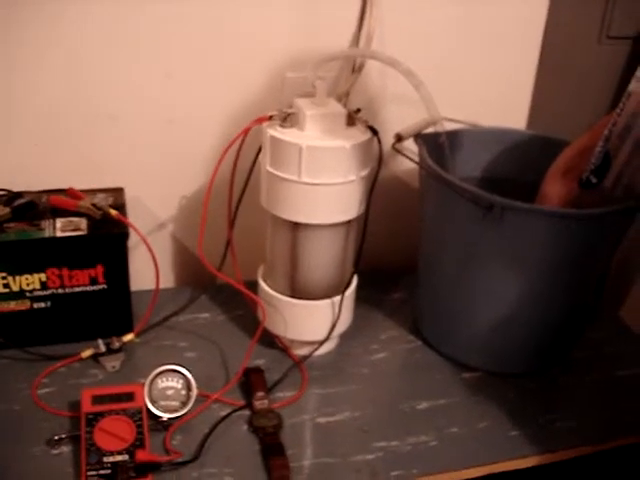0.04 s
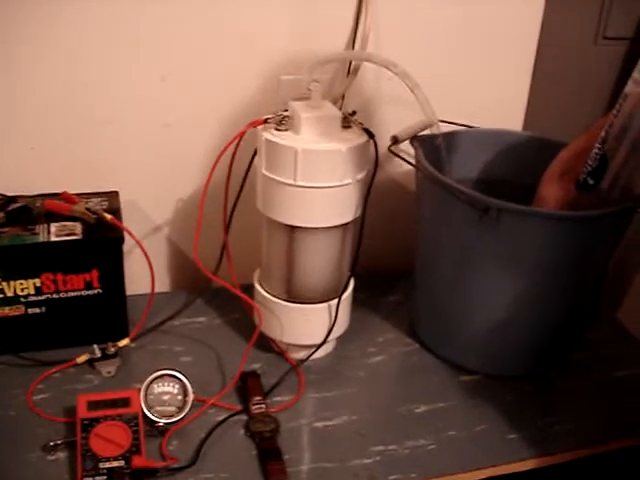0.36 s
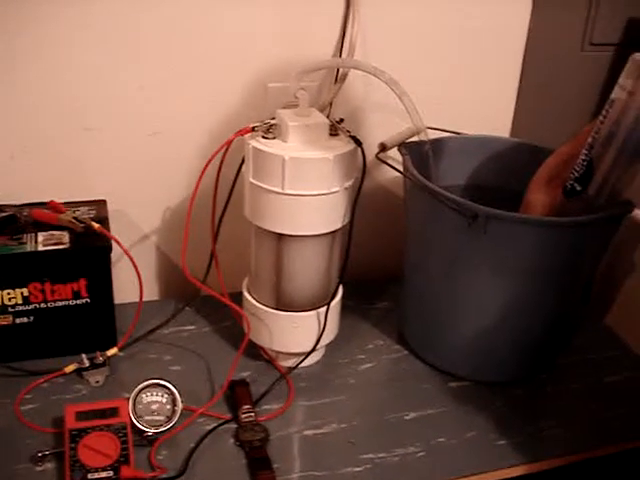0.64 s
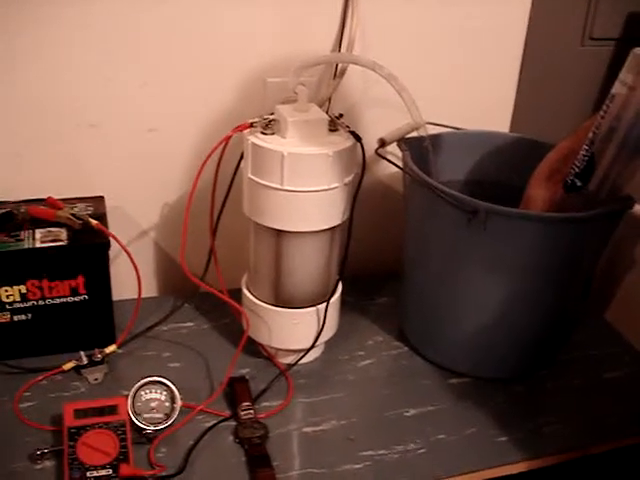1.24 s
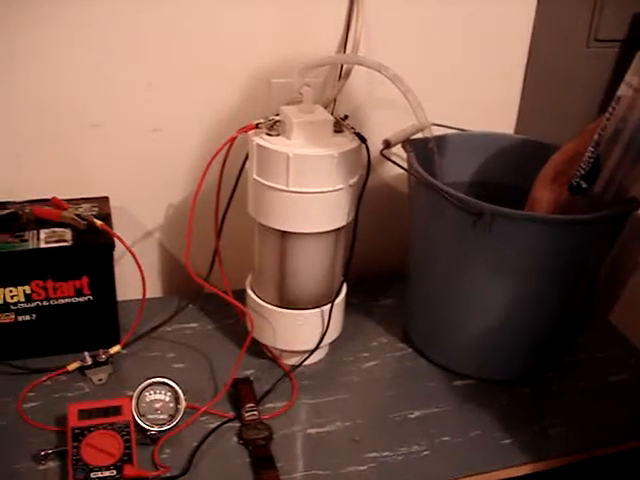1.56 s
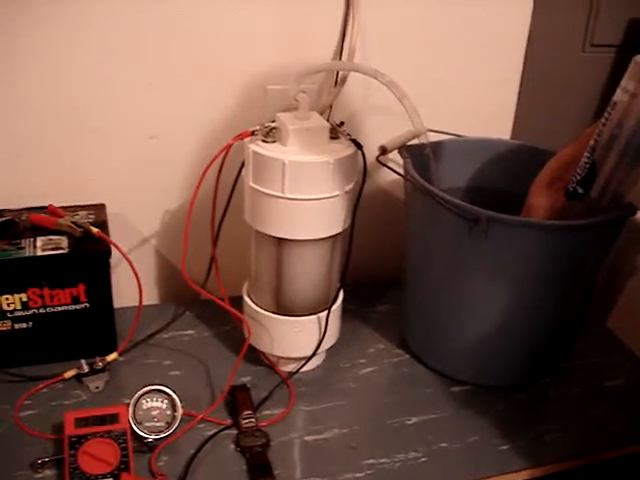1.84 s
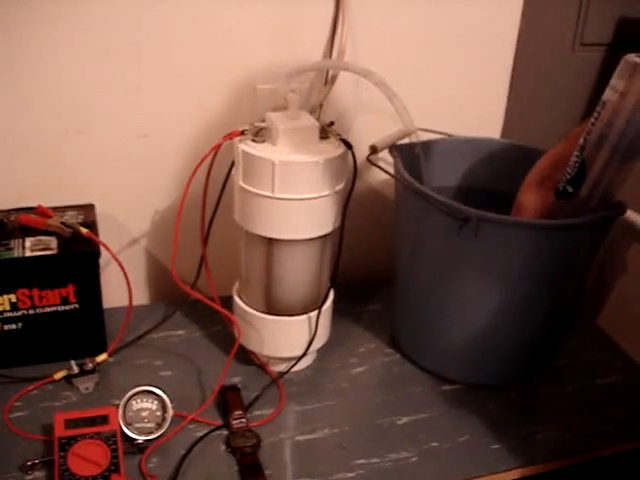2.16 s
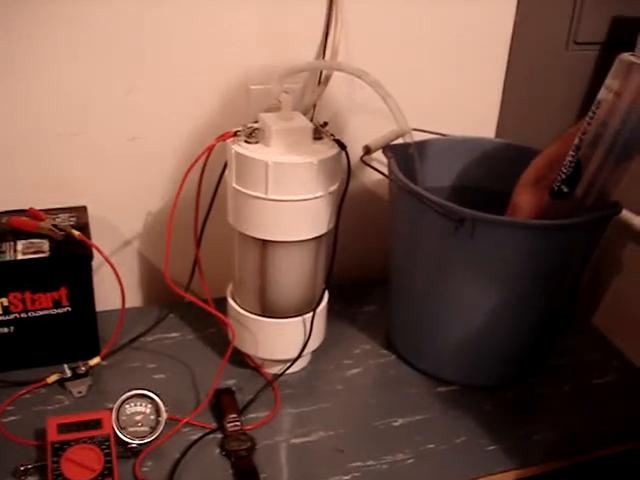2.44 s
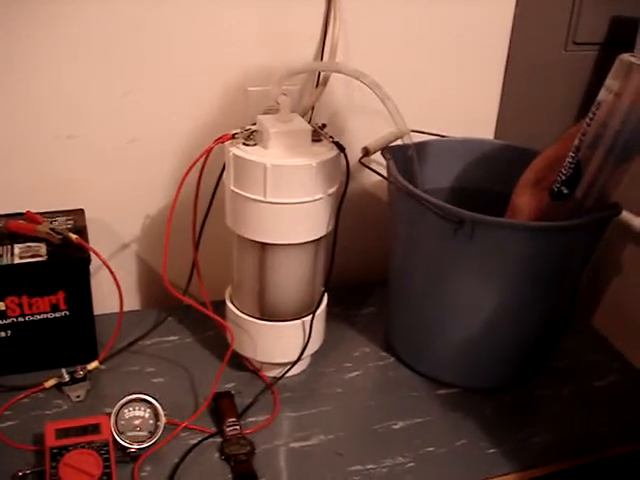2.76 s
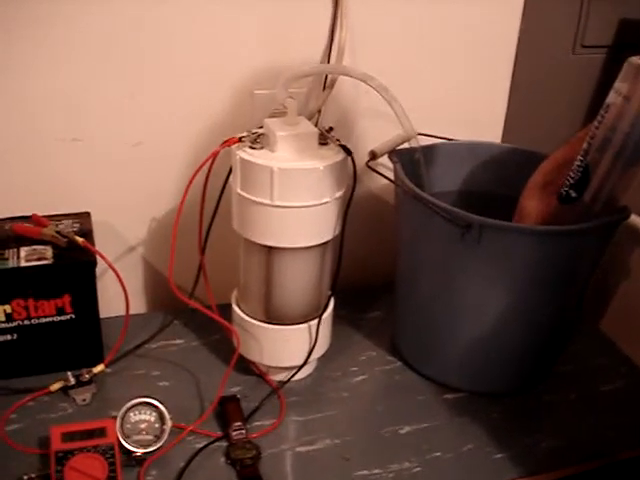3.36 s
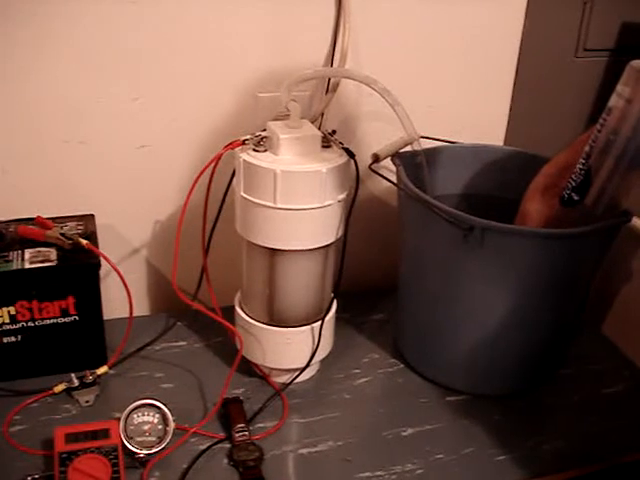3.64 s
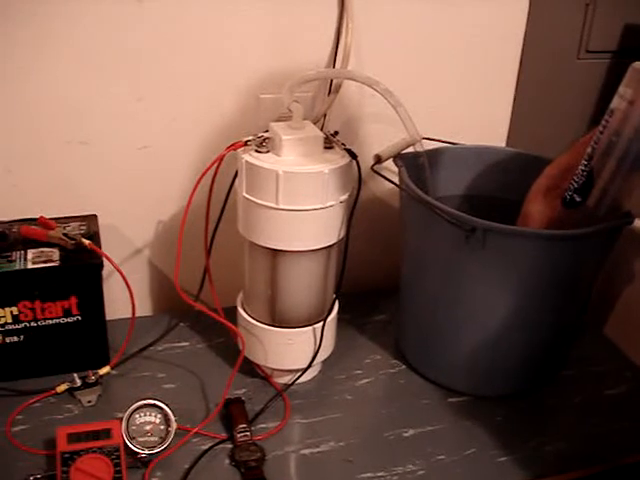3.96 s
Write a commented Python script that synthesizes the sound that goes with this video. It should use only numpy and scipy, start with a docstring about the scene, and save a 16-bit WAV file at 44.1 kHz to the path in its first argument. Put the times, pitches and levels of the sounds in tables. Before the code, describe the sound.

Low bubbling comes in short uneven clusters as gas escapes underwater, each bubble knocking hollowly in the bucket. A steady hum, room air and a thin whirr fill the small workshop, with a brief faint sizzle near the end.

```python
"""A small workshop: gas leaves a tube under water in irregular bursts of two to five bubbles.
Each bubble rings briefly with rising pitch, gulps and knocks the low modes of the vessel;
a few small ones plip higher. Behind them: room air, a steady electrical hum, a thin fizzy whirr.
One faint tick midway, a short sizzle near the end."""
import sys
import numpy as np
from scipy import signal
from scipy.fft import rfft, irfft
from scipy.io import wavfile

SR = 44100
rng = np.random.default_rng(int(sys.argv[2]) if len(sys.argv) > 2 else 0)


def materialize(psi):
    """Save the field psi as 16-bit PCM at rate SR to the path in sys.argv[1].

    A 1-D psi becomes a single channel; in a 2-D psi each row is a channel.
    """
    bounded = np.clip(np.atleast_2d(psi).T, -1, 1)
    quanta = np.round(bounded * 32767).astype(np.int16)
    wavfile.write(sys.argv[1], SR, quanta)


N = 176400

# Room air spectrum. Each row: frequency in Hz, relative density in dB.
AIR_SPECTRUM = [(20, -5.5), (30, -5), (45, -17.5), (75, -5.5), (120, -3.5), (150, -3.5), (200, 1.5),
                (270, 1), (325, -2.5), (400, 5), (470, -2), (550, 2.5), (720, 0.5), (820, -2), (1100, -3),
                (1400, -10), (2000, -11), (3800, -7.5), (4300, -15.5), (5200, -16), (6200, -20.5),
                (7500, -22), (8300, -22.5), (10000, -24.5)]
# Electrical hum. Each row: frequency in Hz, rms level in dB.
HUM_LINES = [(120, -61), (199.2, -51.5), (398.4, -57), (517, -64), (599, -58.5), (700, -57.5),
             (1038, -61.5), (1181, -66.5), (1320, -70), (1620, -71)]
# Whirr resonances. Each row: centre in Hz, width in Hz, base level in dB, fade in dB per second.
WHIRR_BANDS = [(2455, 370, -54, 1.4), (2637, 420, -62, -0.5), (2960, 100, -54, 0.1),
               (3126, 170, -50.5, 0.84), (3240, 100, -55, -.5), (3603, 330, -53.5, -0.4),
               (3823, 140, -55.5, 1.8)]
# Tones in the whirr. Each row: frequency in Hz, base level in dB.
WHINE_LINES = [(2401, -68), (3058, -53.5), (3106, -60), (3138, -56.5), (3215, -66.5), (3661, -61.5),
               (3704, -68.5), (7612, -82)]
# Gain curve over the whirr's bands and tones. Each row: time in seconds, gain in dB.
WHIRR_GAIN = [(0, 0), (1.4, 1.5), (2.4, 0.2), (3.3, -.7), (4, -4.5)]
# Vessel modes. Each row: frequency in Hz, relative level in dB, T60 in seconds.
VESSEL_MODES = [(235, -13.5, 0.15), (290, -13, 0.1), (350, -14, .06), (518, 2, 0.17), (559, -14, 0.035),
                (631, 5.5, 0.063), (703.3, -1, 0.13), (767, -19.5, 0.041)]
# Small bubbles. Each row: start in seconds, initial pitch in Hz, gain in dB.
SMALL_BUBBLES = [(.122, 1080, -42), (0.39, 2010, -39.5), (.828, 1090, -36), (1.306, 1160, -43),
                 (1.495, 2180, -38.5), (1.598, 2300, -38), (1.765, 1110, -40), (2.140, 1654, -39),
                 (2.727, 1188, -31.5), (3.549, 980, -41)]
# Large bubbles. Each row: start in seconds, initial pitch in Hz, ring gain in dB,
# ring decay in seconds, knock gain in dB, gulp gain in dB.
LARGE_BUBBLES = [(.083, 656, -29, 0.011, -37.5, -38), (.123, 640, -23, 0.0045, -38, -46),
                 (.389, 689, -33, 0.025, -41, -60), (.673, 684, -28, 0.0087, -38.5, -48),
                 (.722, 594, -36, .005, -40, -39.5), (.783, 650, -21.5, 0.011, -40, -47),
                 (.9725, 678, -30, 0.012, -34.5, -37.5), (1.2585, 674, -25, 0.0092, -41.5, -49),
                 (1.3055, 677, -29.5, 0.012, -40.5, -45), (1.580, 680, -22, 0.024, -45, -47),
                 (1.620, 675, -30, 0.013, -40, -64), (1.661, 691, -36, 0.021, -41, -63),
                 (1.764, 667, -24, 0.0097, -46, -48), (1.810, 690, -32.5, 0.017, -36, -40.5),
                 (2.056, 678, -27.5, .007, -40, -42), (2.100, 710, -32.5, 0.012, -39.5, -36.5),
                 (2.154, 680, -23.5, 0.013, -41, -44), (2.567, 685, -33.5, 0.0063, -40, -53),
                 (2.617, 680, -31.5, 0.0093, -36.5, -39), (2.673, 630, -19.5, 0.0053, -42.5, -46),
                 (2.727, 692, -33, 0.016, -46, -61), (2.801, 674, -20.5, 0.013, -43, -44),
                 (3.100, 690, -34, 0.021, -38, -39), (3.140, 666, -27, .006, -49, -36),
                 (3.195, 686, -22.5, 0.016, -44, -45), (3.4945, 663, -33, 0.0043, -37, -43),
                 (3.628, 630, -28, .007, -38, -57), (3.671, 690, -27, 0.0067, -39, -54),
                 (3.724, 668, -23, 0.011, -45, -59), (3.776, 670, -24, .011, -43, -42),
                 (3.825, 675, -22, 0.0086, -40, -46)]


def undb(db):
    """Decibels to gain."""
    return 10 ** (np.asarray(db) / 20)


def add(out, start_s, sound):
    """Mix a sound in at its start time."""
    i = max(int(start_s * SR), 0)
    out[i:i + len(sound)] += sound[:max(N - i, 0)]


def noise(shape):
    """Unit-rms noise with spectral gain shape(Hz)."""
    hz = np.arange(N // 2 + 1) * SR / N + 1e-3
    x = irfft(rfft(rng.standard_normal(N)) * shape(hz), N)
    return x / np.sqrt(np.mean(x ** 2))


def band(hz, width_hz):
    """Unit-rms noise in a steep resonance."""
    return noise(lambda f: 1 / (1 + ((f * f - hz * hz) / (f * width_hz)) ** 2))


def wander(rate_hz):
    """Unit-rms random drift, low-passed at rate_hz."""
    return noise(lambda f: 1 / (1 + (f / rate_hz) ** 4))


def tones(table, drift_hz, drift_rate_hz, flutter_db):
    """Sines wavering in pitch and level."""
    out = np.zeros(N)
    for hz, db in table:
        peak = np.sqrt(2) * undb(db + flutter_db * wander(rate_hz=14))
        cycles = rng.random() + np.cumsum(hz + drift_hz * wander(drift_rate_hz)) / SR
        out += peak * np.sin(2 * np.pi * cycles)
    return out


def air(level_db=-43.5, flutter_db=0.4):
    """Even broadband room noise."""
    hz, db = np.array(AIR_SPECTRUM).T
    gain = undb(level_db + flutter_db * wander(rate_hz=6.3))
    return gain * noise(lambda f: undb(np.interp(np.log(f), np.log(hz), db)))


def hum():
    """Electrical hum: near-steady low tones."""
    return tones(HUM_LINES, drift_hz=0.91, drift_rate_hz=5.85, flutter_db=1.66)


def whirr(fizz_db=0.38, hiss_db=-63, throb_db=2, throb_peak_s=0.025, throb_period_s=0.278):
    """Fizzy noise in narrow resonances, whining tones, a throbbing hiss above."""
    t = np.arange(N) / SR
    body = sum(undb(db - fade_db_per_s * t) * band(hz, width_hz)
               for hz, width_hz, db, fade_db_per_s in WHIRR_BANDS)
    body *= undb(fizz_db * wander(rate_hz=130))
    whine = tones(WHINE_LINES, drift_hz=3.32, drift_rate_hz=14.4, flutter_db=4.0)
    gain_db = np.interp(t, *np.array(WHIRR_GAIN).T)
    throb = np.cos(2 * np.pi * (t - throb_peak_s) / throb_period_s)
    hiss = undb(hiss_db + throb_db * throb) * band(6910, width_hz=400)
    return (body + whine) * undb(gain_db) + hiss


def tick(centre_s=2.531, width_s=0.004, level_db=-45):
    """One faint tick: a Gaussian burst of high noise."""
    t = np.arange(N) / SR
    return undb(level_db) * np.exp(-((t - centre_s) / width_s) ** 2) * band(5100, width_hz=1500)


def sizzle(start_s=3.82, decay_s=0.11, band_db=-57):
    """A thin noise band and a wider spray: sudden onset, fast decay."""
    t = np.arange(N) / SR
    bands = band(8500, width_hz=550) + band(6500, width_hz=3100)
    envelope = (t > start_s) * np.exp(-abs(t - start_s) / decay_s)
    return undb(band_db) * bands * envelope


def room(x, t60_s=0.19, delay_s=0.00593, wet_db=-14):
    """Add a short diffuse tail from the near walls."""
    t = np.arange(SR // 2) / SR
    tail = rng.standard_normal(len(t)) * undb(-60 * t / t60_s) * (t > delay_s)
    tail /= np.sqrt(np.sum(tail ** 2))
    return x + undb(wet_db) * signal.fftconvolve(x, tail)[:N]


def knock(attack_s=0.00085, detune_spread=0.0061):
    """Vessel modes jolted by a bubble, slightly detuned each time."""
    t = np.arange(SR // 4) / SR
    detunes = 1 + detune_spread * rng.standard_normal(len(VESSEL_MODES))
    modes = sum(undb(db - 60 * t / t60_s) * np.sin(2 * np.pi * hz * detune * t)
                for (hz, db, t60_s), detune in zip(VESSEL_MODES, detunes))
    return modes * (1 - np.exp(-t / attack_s))


def ring(hz, swell_s, decay_s, rise_fraction=0.0624, rise_s=0.016):
    """One bubble: swells at pinch-off, rises in pitch, dies away ever faster."""
    t = np.arange(SR // 5) / SR
    pitch_hz = hz * (1 + rise_fraction * (1 - np.exp(-t / rise_s)))
    swell = 1 - np.exp(-(t / swell_s) ** 2)
    decay = np.exp(-(t / decay_s) ** 1.35)
    return np.sin(2 * np.pi * np.cumsum(pitch_hz) / SR) * swell * decay


def bubbling(gulp_hz=274):
    """Gas leaving the tube: large bubbles ring, knock and gulp; small ones plip."""
    out = np.zeros(N)
    for start_s, hz, ring_db, decay_s, knock_db, gulp_db in LARGE_BUBBLES:
        add(out, start_s, undb(ring_db) * ring(hz, swell_s=0.0027, decay_s=decay_s))
        add(out, start_s, undb(knock_db) * knock())
        add(out, start_s, undb(gulp_db) * ring(gulp_hz, swell_s=0.0032, decay_s=0.029))
    for start_s, hz, db in SMALL_BUBBLES:
        add(out, start_s, undb(db) * ring(hz, swell_s=0.0011, decay_s=0.0092))
    return out


def scene():
    """Mono mix; room tail on the bubbles only."""
    return (hum() + room(bubbling()) + whirr() + air() + tick() + sizzle())[None]


def record(dry):
    """Steep elliptic low-pass."""
    cutoff_hz = 10050
    return signal.sosfilt(signal.ellip(12, 0.2, 70, cutoff_hz, fs=SR, output="sos"), dry)


dry = scene()
out = record(dry)
materialize(out)
```